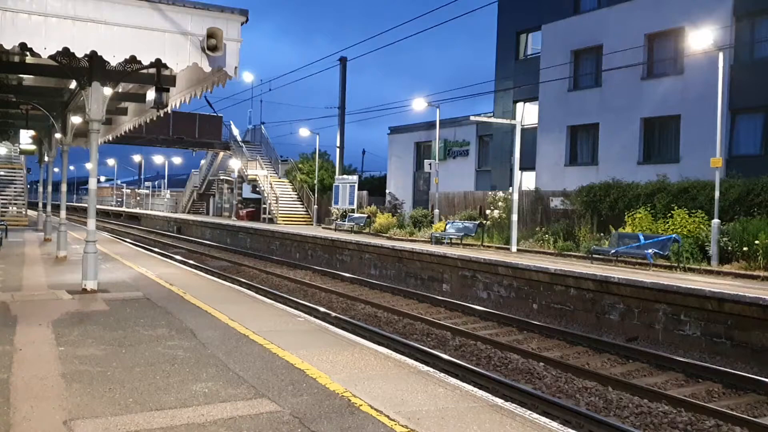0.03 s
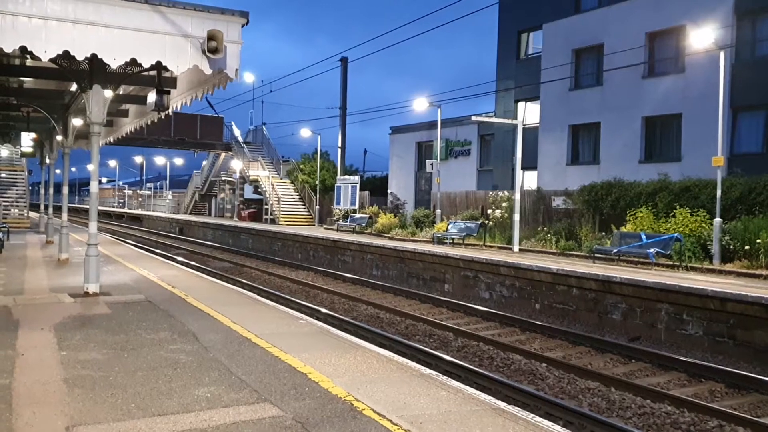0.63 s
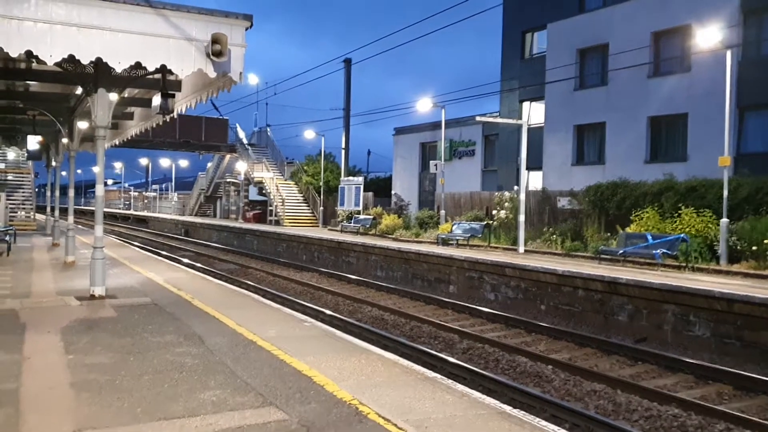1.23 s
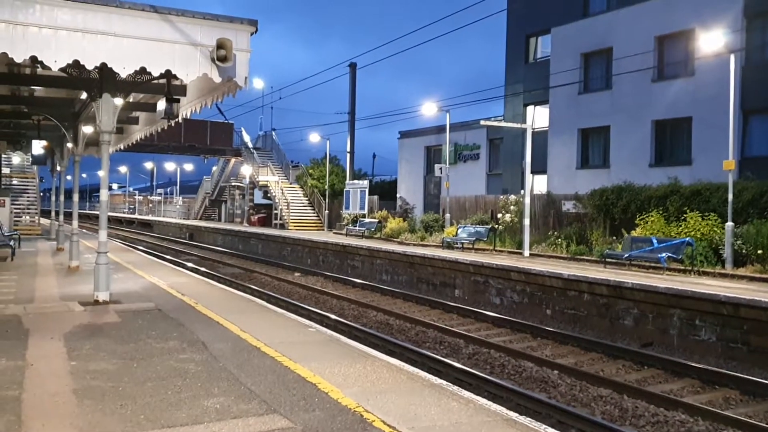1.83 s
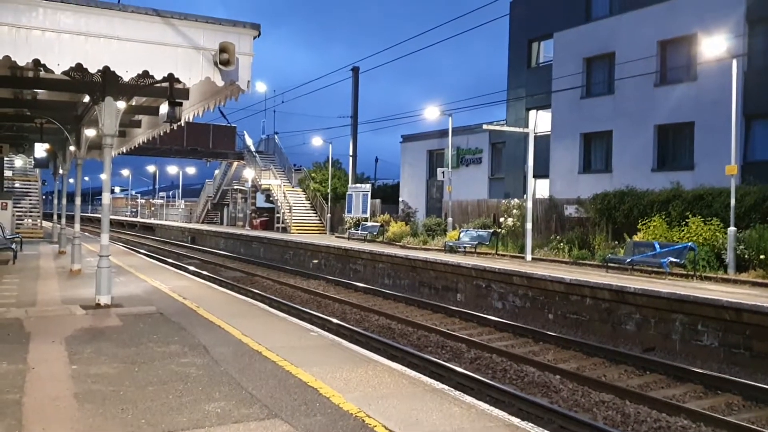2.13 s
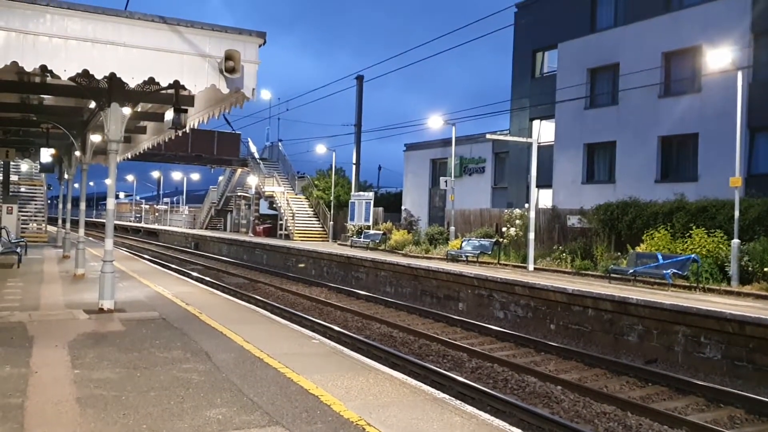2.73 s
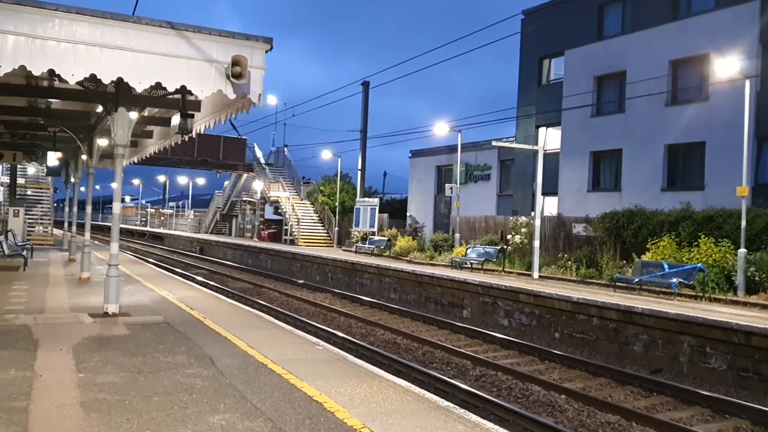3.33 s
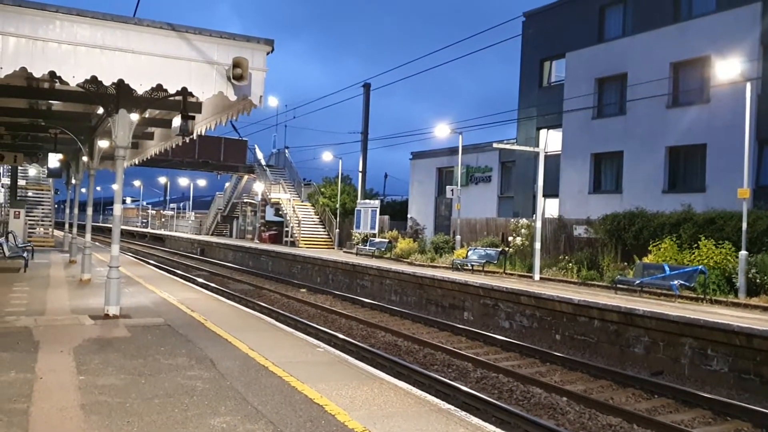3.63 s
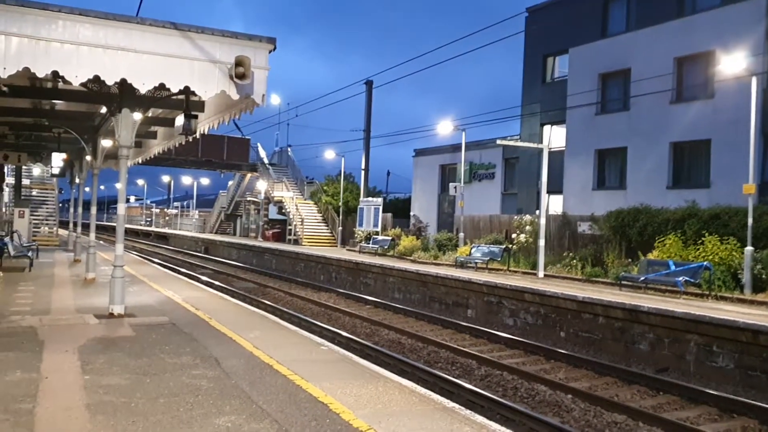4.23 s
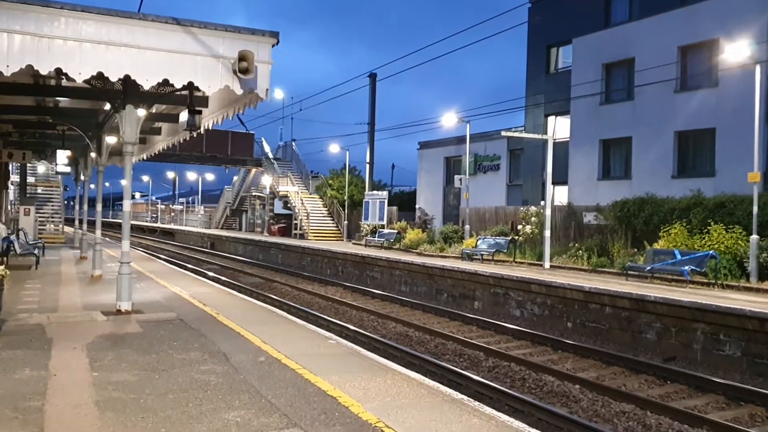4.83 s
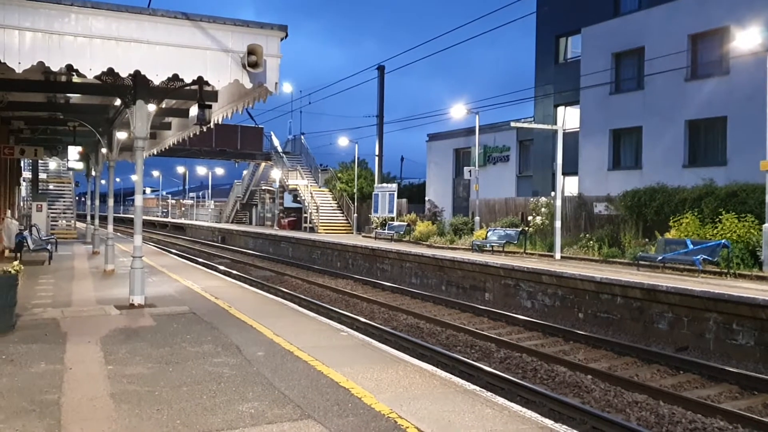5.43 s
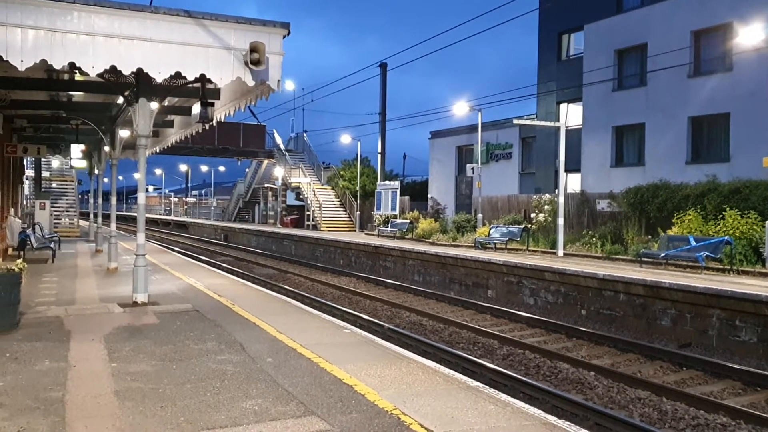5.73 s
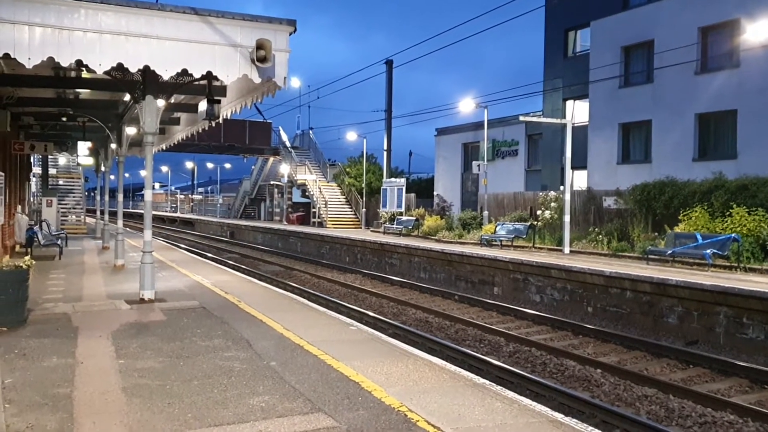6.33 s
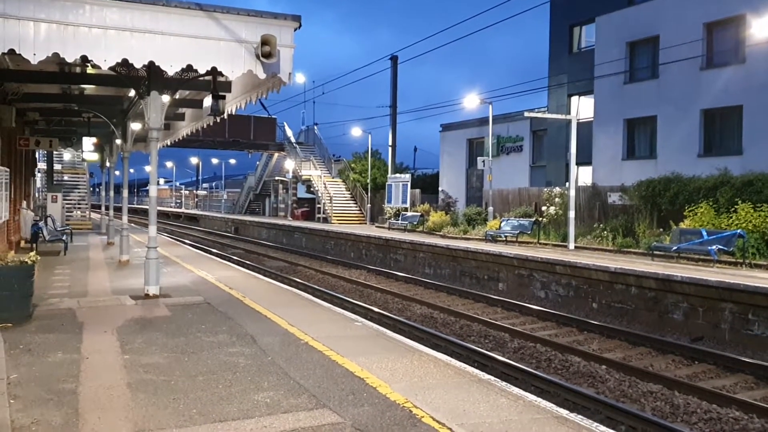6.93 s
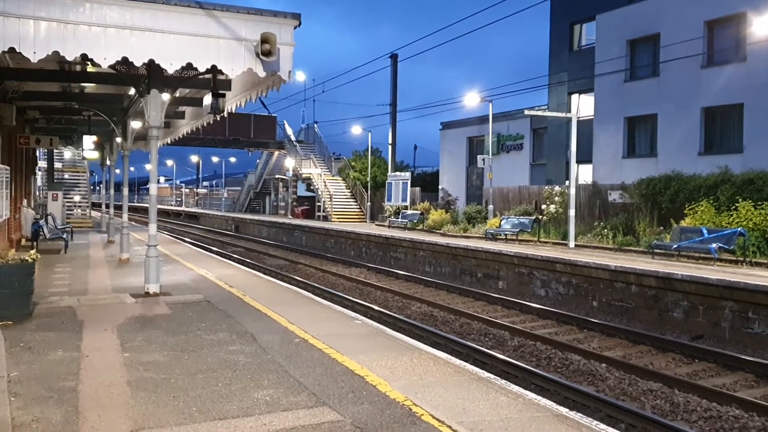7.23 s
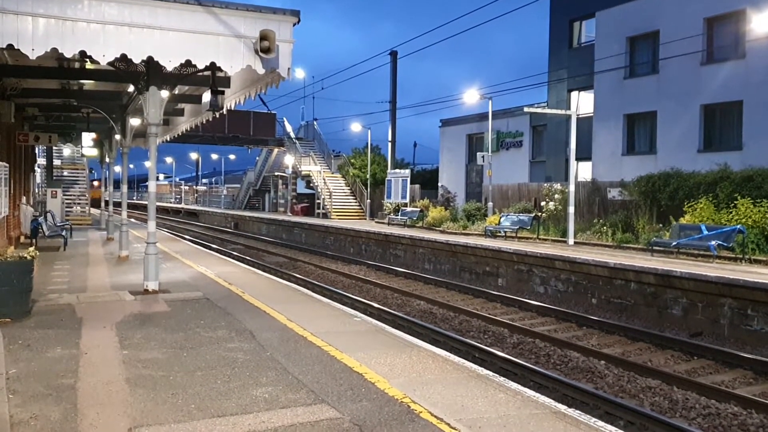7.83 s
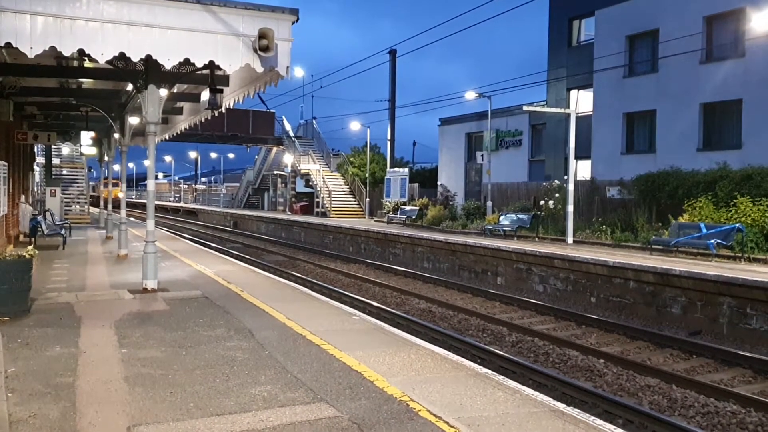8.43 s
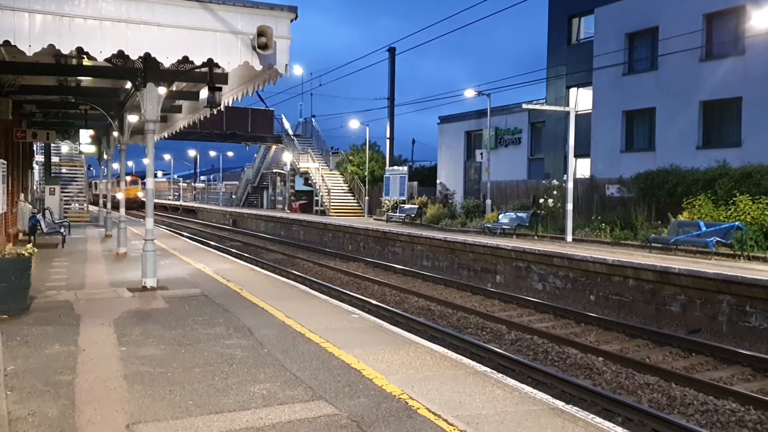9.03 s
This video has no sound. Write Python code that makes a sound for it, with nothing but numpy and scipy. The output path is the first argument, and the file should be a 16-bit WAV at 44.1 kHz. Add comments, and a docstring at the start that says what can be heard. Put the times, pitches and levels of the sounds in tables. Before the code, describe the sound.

Steel rails ring and sizzle in uneven bursts as a far diesel freight train throbs and clatters closer, over a low hum.

```python
"""At dusk an open station platform lies in the town's hush, and a transformer hums. Far off, the engine of a
diesel freight train throbs, and ahead of it the rails sing in high, gritty bursts as the wheel rims rub.
Near 2 s something ticks close by. From about 4 s the bursts grow stronger and brighter, and single
wheel notes flare up. The wheels roar and clatter louder and louder, surging three times from about 7 s.
At the end the train is still approaching. It is all heard through a phone's two microphones."""
import sys
import numpy as np
from scipy import signal
from scipy.fft import rfft, irfft, next_fast_len
from scipy.io import wavfile
from scipy.ndimage import uniform_filter1d, map_coordinates

SR = 44100
rng = np.random.default_rng(int(sys.argv[2]) if len(sys.argv) > 2 else 0)


def generate_wav(sig):
    """Save sig (samples, or channels by samples) to the path in sys.argv[1] as 16-bit PCM at SR."""
    pcm = np.round(np.clip(np.atleast_2d(sig).T, -1, 1) * 32767).astype(np.int16)
    wavfile.write(sys.argv[1], SR, pcm)


N = 404397
TIME = np.arange(N) / SR
FFT_SIZE = next_fast_len(N, True)
FREQ = np.arange(FFT_SIZE // 2 + 1) * SR / FFT_SIZE + 1e-3
NEARNESS = (TIME / TIME[-1]) ** 1.62  # 0 at the start, 1 at the end
ARRIVES_S = 11.58  # when the train would reach the platform
MIC_GAP_M = 0.19
RAIL_LAG_S, TRAIN_LAG_S = .00039, -.00014  # how much later the left microphone hears each


def undb(db):
    """Turn decibels into a gain."""
    return 10 ** (np.asarray(db) / 20)


def unit(x):
    """Scale to an average (rms) size of 1."""
    return x / np.sqrt(np.mean(x ** 2))


def curves(table):
    """Join a table's timed rows with straight lines, one curve per column."""
    times, *columns = np.transpose(table)
    return [np.interp(TIME, times, column) for column in columns]


def slope(points):
    """Join (Hz, dB) points into a curve over all frequencies."""
    hz, db = np.transpose(points)
    return np.interp(np.log(FREQ), np.log(hz), db)


def resonances(notes):
    """A flat gain with a narrow peak at each ringing note."""
    peaks = sum(undb(db) ** 2 / (1 + (2 * (FREQ - hz) / width) ** 2) for hz, width, db in notes)
    return np.sqrt(1 + peaks)


def colour(x, gain):
    """Filter by a gain per frequency, then scale to size 1."""
    return unit(irfft(rfft(x, FFT_SIZE) * gain, FFT_SIZE)[..., :N])


def wander(per_s):
    """A smooth random curve of size 1 that takes per_s new values a second."""
    step = max(int(SR / per_s), 2)
    held = np.repeat(rng.standard_normal(N // step + 1), step)
    return unit(uniform_filter1d(uniform_filter1d(held, step), step)[:N])


def patches(hz, times, width_hz, last_s):
    """Smooth random patches over frequency and time, of size 1."""
    grid = rng.standard_normal((2048, 64))
    places = np.meshgrid(hz / width_hz, times / last_s, indexing="ij")
    return unit(map_coordinates(grid, places, order=1, mode="wrap"))


def swell(peak_s, length_s):
    """A smooth rise to 1 and back."""
    return np.exp(-(2 * (TIME - peak_s) / length_s) ** 2)


def pan(db):
    """Left and right gains; positive dB leans left."""
    return undb(np.array([[.5], [-.5]]) * db)


def blend(a, b, share):
    """Mix unrelated sounds at steady power; b gets the given share."""
    share = np.clip(share, 0, 1)
    return np.sqrt(1 - share) * a + np.sqrt(share) * b


def arriving(x, lag_s):
    """One sound at both microphones, the left one late by lag_s."""
    return np.array([np.roll(x, int(round(lag_s * SR))), x])


def all_around():
    """Noise from all sides: alike at both microphones in the bass, unrelated in the treble."""
    likeness = .98 * np.sinc(2 * FREQ * MIC_GAP_M / 343)
    mid, side = rfft(rng.standard_normal((2, FFT_SIZE)))
    mid, side = mid * np.sqrt(1 + likeness), side * np.sqrt(1 - likeness)
    return irfft(np.array([mid + side, mid - side]), FFT_SIZE)[:, :N]


def tone(hz, waver_db, drift_rad):
    """A far tone that wavers in level and phase as its paths through the air change."""
    cycles = np.cumsum(hz * np.ones(N)) / SR + rng.random()
    return unit(undb(waver_db * wander(5)) * np.sin(2 * np.pi * cycles + drift_rad * wander(4)))


def nearing(end_db, rise_db):
    """Level in dB at a steady approach: it gains rise_db each time the distance halves."""
    seconds_away = np.maximum(ARRIVES_S - TIME, .5)
    return end_db - rise_db * np.log2(seconds_away / seconds_away[-1])


# The tones in the exhaust. Each row: multiple of the crankshaft's turning rate, relative level in dB.
EXHAUST_TONES = [(4, -25), (5, -12), (7, 1), (8, -3), (9, -2), (10, -2), (12, -25), (14, -28), (16, -14.5),
                 (21, -27), (25, -24), (30, -17)]
# The exhaust's rumble. Each row: frequency in Hz, relative level in dB.
RUMBLE_SPECTRUM = [(16, -46), (26, -20), (35, -4), (58, -1.5), (80, 2), (98, -2.5), (112, -18),
                   (170, -16.5), (300, -28.5), (600, -44)]
# The engine swells and fades as its sound bounces off the ground.
# Each row: time in seconds, relative exhaust level in dB, relative firing note level in dB.
ENGINE_LEVELS = [(.1, -44.5, -57), (1.4, -43, -55), (1.6, -41.5, -44), (2.05, -41, -54), (2.4, -40.5, -43),
                 (3.2, -41.5, -57), (3.7, -41, -52), (4.3, -43, -61), (5.2, -36, -47), (6.15, -39.5, -48),
                 (6.4, -34.5, -43), (6.8, -38, -34), (7.1, -36.5, -41), (7.65, -35, -39), (8.3, -33, -31),
                 (8.65, -35, -45), (8.9, -33, -44), (9.17, -31.5, -27)]
SHAFT_HZ = 10.08  # crankshaft turns per second


def locomotive():
    """Uneven cylinders add a row of tones around the firing note, over a rough exhaust rumble."""
    exhaust_db, firing_db = curves(ENGINE_LEVELS)
    throb = unit(sum(undb(db) * tone(multiple * SHAFT_HZ, waver_db=1.5, drift_rad=0.95)
                     for multiple, db in EXHAUST_TONES))
    rumble = colour(all_around(), undb(slope(RUMBLE_SPECTRUM)))
    # the throb stands out more as the locomotive comes into the open
    exhaust = undb(exhaust_db - 0.74) * blend(rumble, throb, 0.27 + 0.57 * NEARNESS)
    firing = undb(firing_db - 1.5) * tone(6 * SHAFT_HZ, waver_db=0.5, drift_rad=0.8)
    whine = arriving(fan_and_gears() + turbo(), TRAIN_LAG_S)
    return (exhaust + firing + whine) * pan(-0.46)


# The fan's and gears' tones.
# Each row: pitch in Hz, far level in dB, near level in dB, waver in dB, phase drift in radians.
WHINE_TONES = [(345.2, -63, -51.5, 4, 1.35), (672, -68, -42, -1, 2), (783, -61, -48, 2, 3.6),
               (1240, -75.5, -54.5, 5.5, 1.6)]


def fan_and_gears():
    """The spinning fan and gears whine louder as the locomotive nears."""
    return sum(undb(far_db + (near_db - far_db) * NEARNESS) * tone(hz, waver_db, drift_rad)
               for hz, far_db, near_db, waver_db, drift_rad in WHINE_TONES)


def turbo():
    """The turbocharger's thin whistle sinks slightly and flutters in the air."""
    pitch_hz = 1874 - 1.9 * TIME
    return undb(nearing(end_db=-53, rise_db=2.5)) * tone(pitch_hz, waver_db=4.5, drift_rad=2.03)


# The notes that wheels and track ring at. Each row: pitch in Hz, width in Hz, strength in dB.
WHEEL_NOTES = [(676, 8.3, 1.5), (778.6, 12.5, 12), (802, 7.6, 14.5), (847, 19, 7), (1021, 20, 5),
               (1177, 11.6, 8.5), (1247, 11, 9), (1353, 9.4, 9.5), (1532, 17, 5.5), (1693, 19, 4.5),
               (1870, 19, 9)]
# The roar of wheels on rail. Each row: frequency in Hz, relative level in dB.
ROAR_SPECTRUM = [(130, -10.5), (300, -12), (410, -10.5), (530, -1), (680, 1.5), (820, -7.5), (910, -7.5),
                 (1100, -9.5), (1800, -31)]
# The brighter clatter of wheels and wagons. Each row: frequency in Hz, relative level in dB.
CLATTER_SPECTRUM = [(600, -26), (1000, 0.5), (1200, 2), (1420, -3), (1600, 0), (1850, -0.5), (2100, -3.5),
                    (3200, -6), (4500, -14.5), (6000, -22), (9000, -31)]
# The roar surges as the train comes into the open.
# Each row: time of the peak in seconds, length in seconds, boost in dB.
ROAR_SURGES = [(6.85, .35, 1.5), (8.15, 0.34, 3), (9.018, 0.43, 3.5)]


def wheels(ring_db):
    """Rough rails shake the wheels and track until they ring; the wagons rattle unevenly."""
    ringing = resonances(WHEEL_NOTES)
    # part of the roar bounces off the station's walls, the rest comes straight down the line
    roar = blend(all_around(), arriving(rng.standard_normal(N), TRAIN_LAG_S), 0.57)
    # part of the clatter runs through the rails and leaves them beside the platform
    clatter = blend(all_around(), arriving(rng.standard_normal(N), RAIL_LAG_S), 0.2)
    roar = colour(roar * undb(0.67 * wander(22)), undb(slope(ROAR_SPECTRUM)) * ringing)
    clatter = colour(clatter * undb(0.95 * wander(35)), undb(slope(CLATTER_SPECTRUM)) * ringing)
    surge_db = sum(db * swell(peak_s, length_s) for peak_s, length_s, db in ROAR_SURGES)
    shake_db = np.interp(ring_db, [-50, -38, -30], [0, 1, 4])  # hard rubbing shakes the wagons too
    roar_db = nearing(end_db=-32, rise_db=8.48) + surge_db
    clatter_db = nearing(end_db=-35.5, rise_db=7.5) + shake_db
    return undb(roar_db) * roar * pan(0.19) + undb(clatter_db) * clatter * pan(-1.3)


# The rubbing that goes on between bursts.
# Each row: time in seconds, relative ring level in dB, relative sizzle level in dB.
STEADY_RUBBING = [(0, -61.5, -62), (2, -61, -63.5), (3.1, -59.5, -64.5), (4.35, -51.5, -50.5),
                  (4.9, -55, -56), (6.2, -50, -45), (7.6, -47.5, -41), (8.4, -43, -37.5),
                  (9.17, -48, -41.5)]
# Bursts of wheel rims (flanges) rubbing the rail. Each row: start in seconds, length in seconds,
# relative ring level in dB, relative sizzle level in dB, the ring's lean to the left in dB.
RUB_BURSTS = [(.08, 0.11, -49, -55, 2), (0.578, .03, -52, -58, 4), (0.73, 0.22, -49.5, -57.5, 3),
              (1.036, 0.14, -48, -58, 3), (1.16, 0.035, -44, -60, -1), (1.532, 0.11, -50, -55, -5),
              (1.635, 0.082, -43.5, -56, -5), (1.796, 0.035, -53, -63, -5), (2.076, 0.14, -49, -59, -7.5),
              (2.43, 0.21, -48.5, -54.5, -4), (2.706, 0.14, -46.5, -56, -4), (2.816, .13, -45.5, -58, -8),
              (3.135, .15, -58, -57, -8), (3.316, .08, -49.5, -57, -7), (3.45, 0.065, -43, -53, -8),
              (3.586, .14, -45, -55, -4.5), (3.83, 0.18, -45.5, -59, -5), (3.995, 0.091, -42.5, -60, -5),
              (4.2, .08, -54, -64, -4), (4.456, 0.22, -41.5, -43, -5), (4.923, 0.22, -43.5, -50.5, -5),
              (5.157, 0.18, -36.5, -43.5, -3.5), (5.481, 0.2, -37, -41, -5),
              (5.824, 0.19, -37.5, -40.5, -3), (6.289, 0.17, -36, -39.5, -4), (6.598, .05, -49, -50, -3),
              (6.733, 0.084, -41, -38, -4), (6.805, 0.13, -35, -50, -5), (6.956, 0.15, -33.5, -41.5, -4),
              (7.16, 0.22, -35.5, -38, -7), (7.373, .08, -33.5, -49, -4), (7.5, 0.063, -36.5, -40, -3),
              (7.905, 0.21, -31, -36.5, -5), (8.127, .05, -29, -43, -3), (8.893, 0.15, -37.5, -35.5, -9),
              (9.105, .05, -61, -35.5, -4)]


def rubbing():
    """Bursts add to the steady rubbing; gives ring level, sizzle level and the ring's lean, in dB."""
    ring_power, sizzle_power = undb(curves(STEADY_RUBBING)) ** 2
    lean = -2 * ring_power  # the steady ring sits 2 dB to the right
    for start_s, length_s, ring_db, sizzle_db, lean_db in RUB_BURSTS:
        ring = undb(ring_db) * burst(start_s, length_s, attack_s=0.027, release_s=0.065)
        sizzle = undb(sizzle_db) * burst(start_s, length_s, attack_s=0.047, release_s=0.085)
        ring_power += ring ** 2
        sizzle_power += sizzle ** 2
        lean += ring ** 2 * lean_db
    return 10 * np.log10(ring_power), 10 * np.log10(sizzle_power), lean / ring_power


def burst(start_s, length_s, attack_s, release_s):
    """The loudness of one rub: the rim bites, holds, and the rail rings out."""
    age = TIME - start_s
    bite = np.sqrt(np.clip(age / attack_s, 0, 1))
    return bite * np.exp(-np.maximum(age - length_s, 0) / release_s)


# The ring, the band that travels furthest in the rail. Each row: frequency in Hz, relative level in dB.
RING_SPECTRUM = [(5000, -44), (6100, -27), (6520, -14), (6820, -4), (7060, 0), (7300, -4), (7480, -12),
                 (7780, -19), (8300, -29), (9500, -42)]
# The sizzle, the rail's upper bands. Each row: frequency in Hz, relative level in dB.
SIZZLE_SPECTRUM = [(4500, -10), (5450, -11), (6000, -10), (7700, -3.5), (8500, -17), (9500, -8.5),
                   (10400, -4.5), (11700, 2.5), (12600, 2), (13800, -0.5), (15000, 1), (16000, 1.5)]


def singing_rails(ring_db, sizzle_db, lean_db):
    """The steel carries the rubbing far ahead of the train, as a high ring and a higher sizzle."""
    # harder rubbing spills over the edges of the band, mostly downwards
    ring_tightness = np.interp(ring_db, [-50, -40, -30], [1.3, 1.08, .86])
    sag = np.interp(ring_db, [-48, -30], [0, .024])
    # from far away only the middle of the upper bands survives
    sizzle_tightness = np.interp(TIME, [0, 6], [1.55, 1.0])
    coarse_slips = friction(grains_per_s=290, grit_db=1.0)
    ring = rail_band(coarse_slips, RING_SPECTRUM, ring_tightness, sag, shimmer_db=4.0)
    fine_slips = friction(grains_per_s=1100, grit_db=0.5)
    sizzle = rail_band(fine_slips, SIZZLE_SPECTRUM, sizzle_tightness, sag, shimmer_db=4.3)
    ring = ring * undb(ring_db + 2.0 + wander(40)) * pan(lean_db)
    sizzle = sizzle * undb(sizzle_db + 3.5 + 0.63 * wander(55)) * pan(-9.5)
    return ring + sizzle


def friction(grains_per_s, grit_db):
    """Tiny slips of steel on steel make grainy noise; the nearest rail reaches both microphones."""
    left, right, nearest = (rng.standard_normal(N) * undb(grit_db * wander(grains_per_s))
                            for _ in range(3))
    return blend(np.array([left, right]), arriving(nearest, RAIL_LAG_S), 0.22)


# Wheel notes that squeal through the rail. Each row: pitch in Hz, width in Hz, relative strength in dB.
SQUEAL_NOTES = [(6540, 12, 7), (6784, 16, 11), (6924, 11, 8), (7080, 20, 4), (7187, 11, 10), (7251, 14, 13),
                (7590, 20, 7), (8620, 40, 5), (10449, 25, 5), (11644, 20, 6), (12118, 16, 8),
                (13157, 11, 10), (13260, 40, 5), (14223, 15, 8), (14524, 15, 6), (14955, 15, 7)]


def rail_band(slips, spectrum, tightness, sag, shimmer_db):
    """The rail filters the slips into a shimmering band; tightness narrows it and sag lowers it."""
    hz, times, frames = signal.stft(slips, SR, nperseg=4096)
    shifted_hz = np.outer(hz, 1 + np.interp(times, TIME, sag))
    band_db = np.interp(shifted_hz, FREQ, slope(spectrum)) * np.interp(times, TIME, tightness)
    # the wheels' notes come through more as the train nears, each in its own moments
    clearness = np.interp(times, [0, 4, 7], [.15, .5, .95])
    moments = np.maximum(1 + 0.34 * patches(hz, times, width_hz=210, last_s=0.46), 0)
    notes_db = 20 * np.log10(np.interp(hz, FREQ, resonances(SQUEAL_NOTES)))
    squeal_db = notes_db[:, None] * clearness * moments
    # countless weaker notes ripple the band
    ripple_db = shimmer_db * patches(hz, times, width_hz=36, last_s=.35)
    ripple_db += patches(hz, times, width_hz=170, last_s=0.32)
    gain = undb(band_db + squeal_db + ripple_db)
    gain /= np.sqrt(np.mean(gain ** 2, axis=0))  # same power at every moment
    return unit(signal.istft(frames * gain, SR)[1][:, :N])


# The rails' faint, far-travelled hiss. Each row: frequency in Hz, relative level in dB.
HISS_SPECTRUM = [(6300, -22), (7050, 3), (7900, -19), (10000, -31), (12000, -12), (14000, 16), (15200, 23),
                 (16000, 1)]


def rail_hiss(ring_db):
    """A faint hiss pulses with the far bursts and is buried under the near ones."""
    level_db = np.interp(ring_db, [-65, -49], [-64.5, -53.5])
    hiss = colour(rng.standard_normal((2, N)), undb(slope(HISS_SPECTRUM)))
    return undb(level_db) * hiss * pan(-9.0)


# Single wheel notes that flare up.
# Each row: time of the peak in seconds, length in seconds, pitch in Hz, relative level in dB.
WHEEL_FLARES = [(4.0, .55, 8580, -62), (5.1, .3, 5470, -56), (6.05, .3, 5470, -53), (6.4, .15, 5470, -55),
                (6.78, .22, 5470, -54), (7.17, .25, 5470, -54), (8.37, .32, 5430, -55)]


def wheel_flares():
    """Now and then one ringing note of a wheel swells up raggedly and dies away."""
    flares = np.zeros((2, N))
    for peak_s, length_s, hz, db in WHEEL_FLARES:
        narrow_peak = 1 / (1 + ((FREQ - hz) / 130) ** 2)
        note = colour(rng.standard_normal((2, N)), narrow_peak)
        flares += undb(db) * swell(peak_s, length_s) * note
    return flares * undb(1.5 * wander(30)) * pan(-3)


# The hush of station and town. Each row: frequency in Hz, relative level in dB.
HUSH_SPECTRUM = [(22, -6), (42, 13.5), (90, 4.5), (130, 2.5), (320, 0), (440, -2), (780, -2), (1200, -8),
                 (2200, -8), (3300, -5.5), (4800, -11.5), (6200, -19), (8200, -40), (16000, -36)]
# The side the hush leans to. Each row: frequency in Hz, left minus right in dB.
HUSH_LEAN = [(100, -2.5), (1200, -2.5), (2400, -5.5), (4400, -7), (8000, -13)]


def town_hush():
    """Soft noise drifts in from the town all around, a little stronger on the right."""
    waver = undb(.3 * wander(5))
    gain = undb(slope(HUSH_SPECTRUM)) * pan(slope(HUSH_LEAN))
    return undb(-41.5) * colour(all_around() * waver, gain)


def transformer():
    """Mains power makes a transformer hum on one low note."""
    return undb(-44.0) * tone(hz=100, waver_db=0.5, drift_rad=0.38) * pan(-3.2)


def tick(at_s, level_db, decay_s):
    """One tiny dry tick close by."""
    age = np.maximum(TIME - at_s, 0)
    return -undb(level_db) * (TIME >= at_s) * np.exp(-age / decay_s) * pan(1.5)


def scene():
    """The train, the singing rails and the station together."""
    ring_db, sizzle_db, lean_db = rubbing()
    train = locomotive() + wheels(ring_db)
    rails = singing_rails(ring_db, sizzle_db, lean_db) + rail_hiss(ring_db) + wheel_flares()
    station = town_hush() + transformer() + tick(at_s=1.917, level_db=-19, decay_s=.00006)
    return train + rails + station


def record(dry):
    """The phone starts listening a moment late and cuts the highest treble."""
    start_s, top_hz = .106, 15720
    treble_cut = signal.ellip(12, .2, 75, top_hz, fs=SR, output="sos")
    return signal.sosfilt(treble_cut, dry * (TIME >= start_s))


dry = scene()
out = record(dry)
generate_wav(out)
```